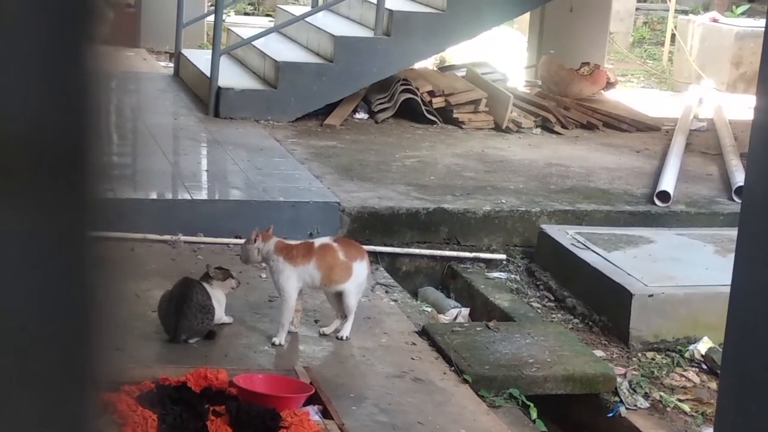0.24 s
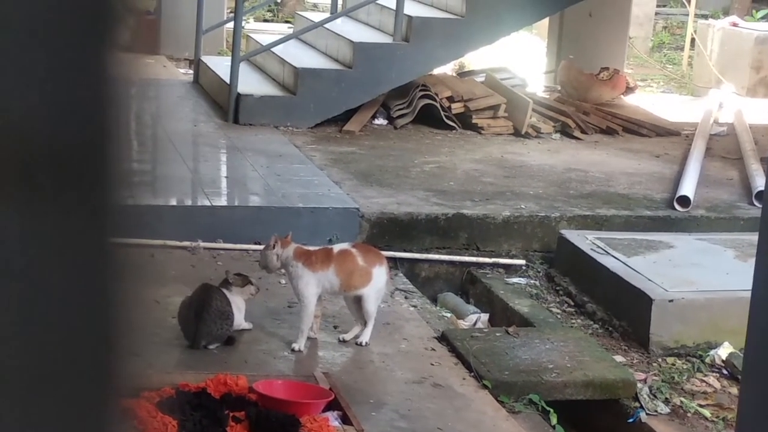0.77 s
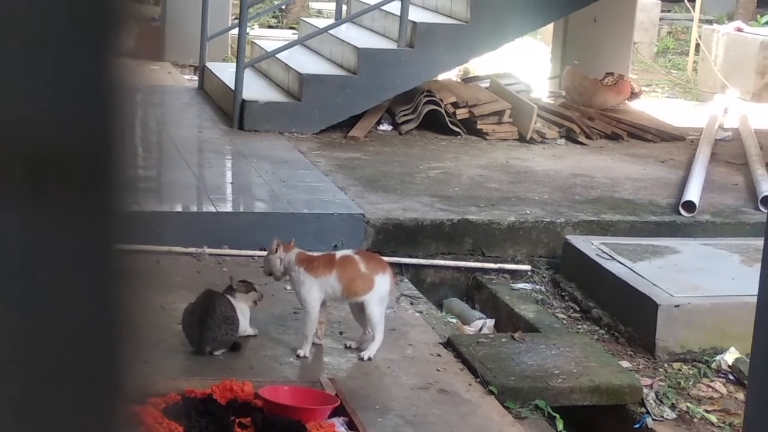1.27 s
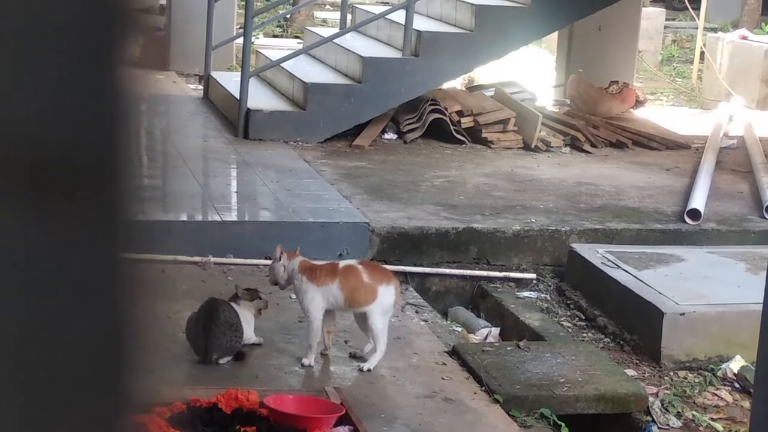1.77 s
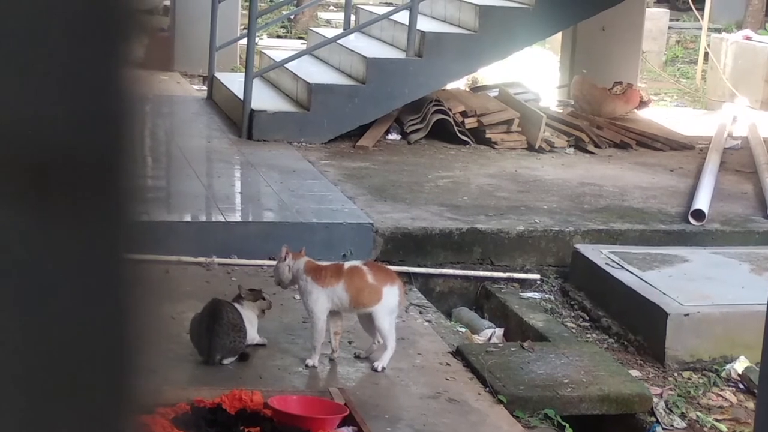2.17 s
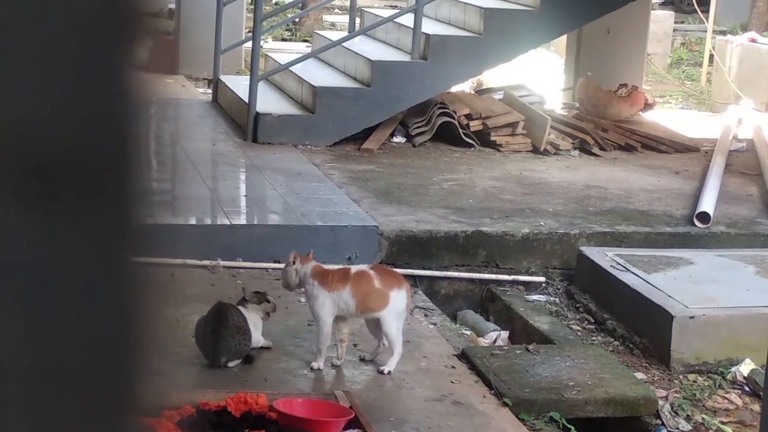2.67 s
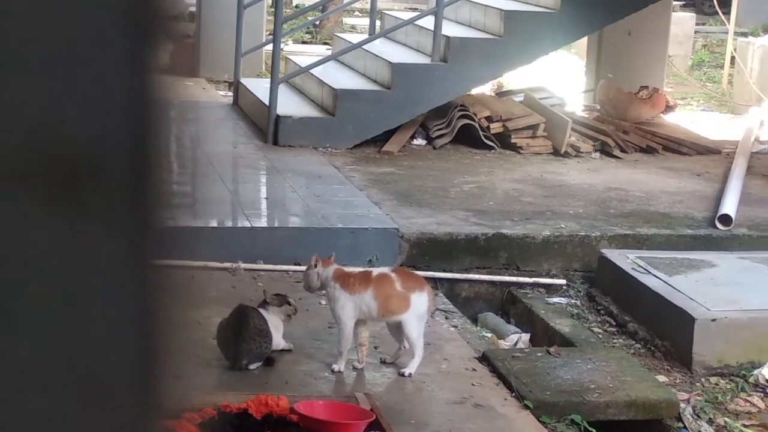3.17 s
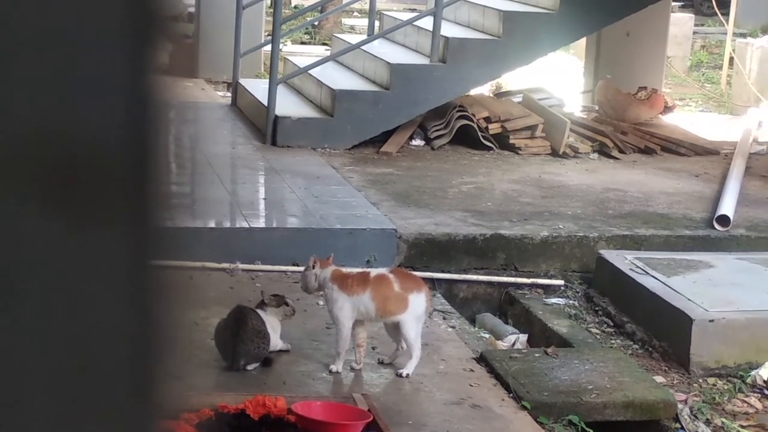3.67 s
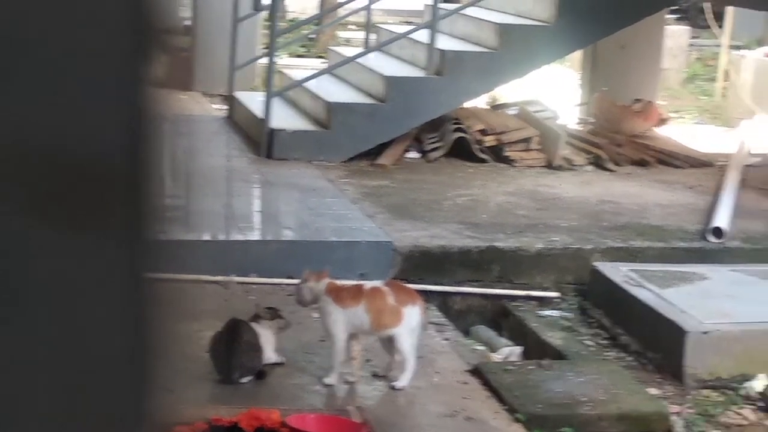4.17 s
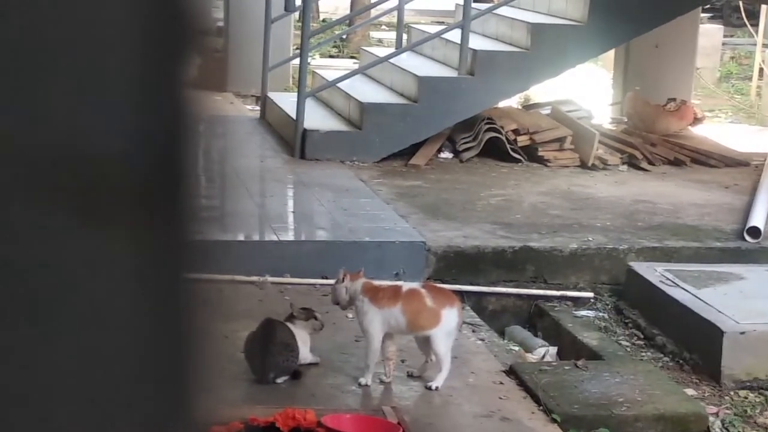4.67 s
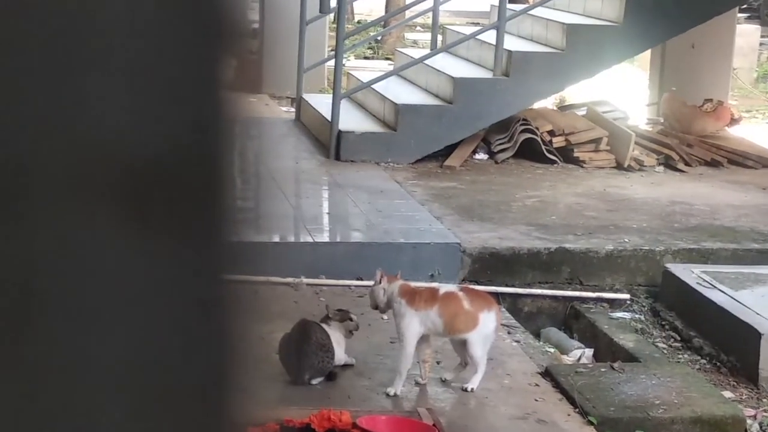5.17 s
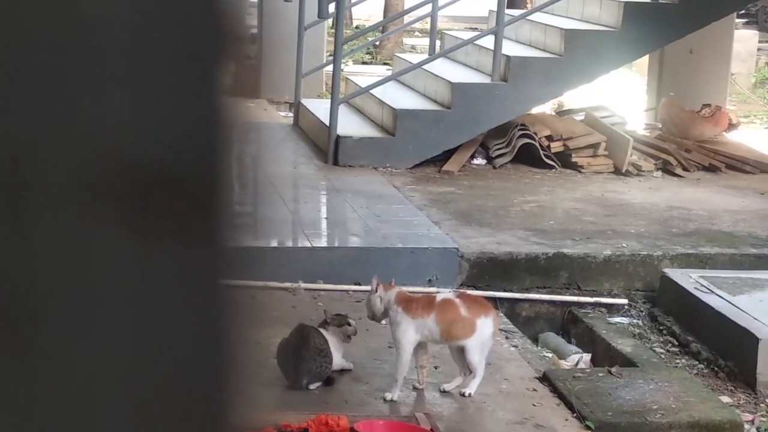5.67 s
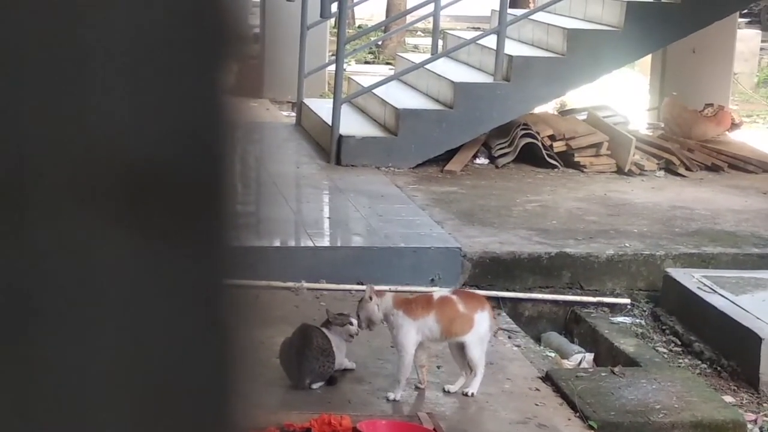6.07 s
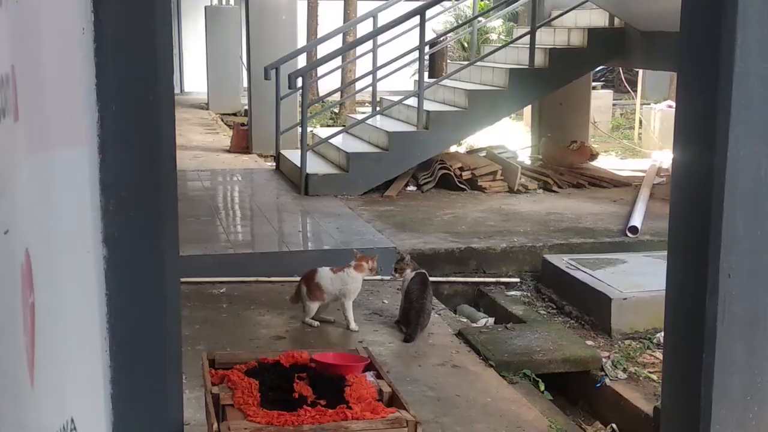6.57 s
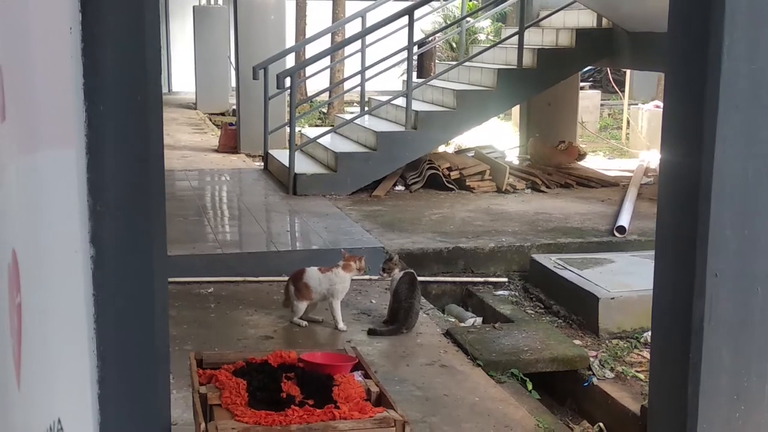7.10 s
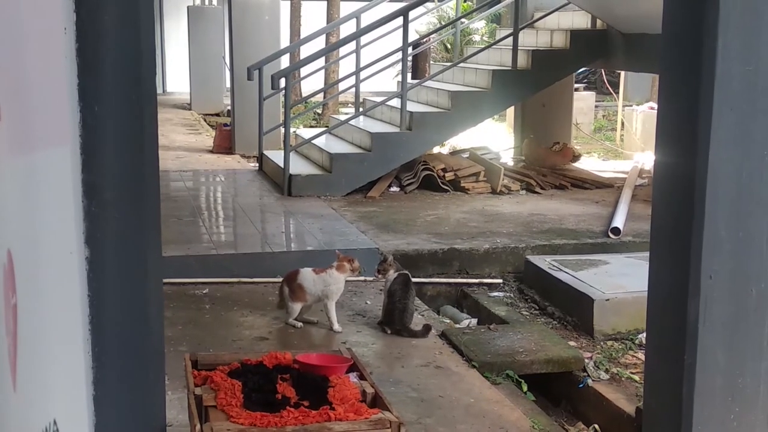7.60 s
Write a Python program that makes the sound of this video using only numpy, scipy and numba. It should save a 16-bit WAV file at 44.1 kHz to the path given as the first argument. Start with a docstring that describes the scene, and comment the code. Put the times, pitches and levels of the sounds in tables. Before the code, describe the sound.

Two cats yowl over each other in an echoing concrete yard, in two bouts, the second cut off abruptly, leaving quiet hum and a tap.

```python
"""Two cats yowling in a yard

Two cats face off on a concrete walkway, a few metres from a hand-held phone, and yowl over each other in two bouts.
Each voice is a train of glottal pulses, now clear, now rasping, through a mouth that opens and closes;
walls and floor echo it. The second bout is cut off short, leaving the quiet yard, made of bands of noise,
and a low rumble that swells and fades in two bands of noise, with a sleeve brush and a finger tap."""
import sys
import numpy as np
from scipy import signal
from scipy.io import wavfile
from scipy.ndimage import uniform_filter1d, minimum_filter1d, map_coordinates
from numba import njit

SR = 44100
rng = np.random.default_rng(int(sys.argv[2]) if len(sys.argv) > 2 else 0)


def put_to_file(sound):
    """Save the sound as 16-bit audio at rate SR, in the file named by the first command-line argument."""
    columns = np.atleast_2d(sound).T  # one column per channel
    safe = np.clip(columns, -1, 1)
    whole_steps = np.round(safe * 32767)
    wavfile.write(sys.argv[1], SR, whole_steps.astype(np.int16))


N = 345744
TIME = np.arange(N) / SR
TOP_HZ = 15400  # upper limit of the phone's microphones


def cats():
    """The leader starts each bout; the rival joins with a rasp and outlasts it in the first."""
    # Pitch, level and mouth of each yowl, each on its own path.
    # Each row: time in seconds, pitch in Hz, relative mouth level in dB, mouth resonance in Hz.
    leader_tail = [(0, 255.6, -34, 1340), (.09, 248.4, -42, 1270), (.17, 235.4, -43.5, 1310),
                   (.28, 207.6, -49, 850)]
    leader_first = [(.3, 217.8, -48.5, 430), (.38, 248.3, -41.5, 599), (.48, 263, -42, 790),
                    (.55, 281.5, -30.5, 830), (.64, 296.4, -32.5, 1075), (.76, 348.5, -24.5, 1220),
                    (.845, 391.6, -19, 1548), (.91, 399.8, -15, 1710), (.97, 399, -20.5, 1890),
                    (1.05, 405, -20, 1870), (1.14, 401.8, -13, 1863), (1.42, 399, -17.5, 1837),
                    (1.52, 392.6, -18.5, 1730), (1.66, 382, -22.5, 1874), (1.76, 363.2, -14, 1508),
                    (2.0, 337.9, -24, 1470), (2.22, 304.3, -29, 1199), (2.52, 252.8, -41, 1217)]
    leader_second = [(4.125, 227.5, -42.5, 880), (4.16, 267.4, -33.5, 1020), (4.2, 294.7, -32.5, 1060),
                     (4.28, 324.6, -22, 1360), (4.39, 352, -20.5, 1460), (4.5, 379.7, -18, 1576),
                     (4.66, 412.3, -15.5, 1705), (4.79, 401.6, -17, 1959), (4.99, 399.7, -12, 1950),
                     (5.09, 391, -18.5, 1796), (5.2, 379.2, -21, 1560), (5.38, 344.2, -22, 1367),
                     (5.5, 342.9, -22.5, 1380), (5.64, 335.1, -21, 1343), (5.78, 343.1, -22, 1540),
                     (5.91, 346.4, -24, 1620), (6.01, 342.5, -19.5, 1500), (6.1, 333.5, -23, 1253),
                     (6.18, 322, -26, 1080), (6.3, 299, -29.5, 1018), (6.55, 266.1, -32, 1063)]
    rival_first = [(1.06, 242.2, -34.5, 1450), (1.12, 313, -29, 1610), (1.28, 480.2, -30.5, 2020),
                   (1.48, 492.4, -23.5, 2017), (1.72, 474.2, -22.5, 1867), (1.92, 455.2, -29, 1832),
                   (2.06, 438.3, -18, 1653), (2.28, 419.6, -25.5, 1560), (2.42, 405.7, -26, 1556),
                   (2.56, 390.6, -29.5, 1507), (2.68, 388, -25.5, 1520), (2.8, 378.6, -28, 1416),
                   (2.88, 386.3, -20.5, 1601), (3.03, 359.5, -19.5, 1420), (3.18, 312.5, -33.5, 1169),
                   (3.25, 289.2, -41, 910), (3.35, 261.2, -45.5, 840), (3.6, 218.7, -49.5, 620),
                   (3.82, 170.9, -52.5, 521.3), (4.04, 160.2, -58, 699)]
    rival_second = [(4.73, 225.4, -41, 1180), (4.79, 278.6, -29.5, 1360), (4.86, 349, -23.5, 1680),
                    (4.96, 435.5, -25, 1920), (5.1, 477, -39.5, 2040), (5.23, 463.7, -26.5, 1900),
                    (5.36, 418.5, -33, 1820), (5.5, 384.5, -33, 1652), (5.63, 389.3, -26, 1691),
                    (5.83, 386.3, -27, 1480), (5.979, 382, -29.5, 1410), (6.25, 383.7, -30.5, 1455),
                    (6.44, 375.1, -27.5, 1528), (6.549, 367.2, -18, 1430)]
    # A quiet moan between the bouts. Each row: time in seconds, pitch in Hz, relative level in dB.
    moan_path = [(3.73, 522, -55), (3.78, 523, -52.5), (3.85, 529.7, -44), (3.87, 575, -70),
                 (3.89, 651, -55), (3.94, 660, -50.5), (3.98, 646, -62), (4.02, 520, -62), (4.1, 502, -48)]
    # Single tones that swell out as whistles or low groans. Each row: loudest time in seconds,
    # seconds from there to 1/e, multiple of the yowl's pitch, relative level in dB.
    leader_swells = [(0.016, 0.043, 5, -34.5), (0.037, 0.067, 9, -47.5), (0.106, 0.054, 10, -49),
                     (.55, 0.026, 3, -39), (3.898, 0.028, 1, -61), (4.138, .02, 8, -45),
                     (4.175, 0.018, 7, -41), (4.35, 0.025, 5, -22), (5.91, 0.13, 5, -25.5),
                     (6.117, 0.087, 13, -49), (6.43, .05, 6, -33)]
    rival_swells = [(2.151, 0.036, 5, -21.5), (2.29, .05, 5, -29), (2.88, 0.042, 7, -44),
                    (3.14, 0.033, 2, -37.5), (3.05, .09, 13, -52), (3.16, 0.039, 13, -49),
                    (3.3, 0.07, 13, -62), (3.27, 0.041, 1, -36), (3.35, 0.038, 2, -50.5),
                    (3.43, 0.024, 1, -38.5), (3.52, 0.074, 2, -50), (3.61, 0.039, 1, -40.5),
                    (3.73, 0.059, 2, -53)]

    leader = leader_yowl(leader_tail, second_db=-14.5, nasal_rise_s=0.078,
                         chest_db=-55, chest_drift_db_per_s=2)
    leader += leader_yowl(leader_first, second_db=-3.0, nasal_rise_s=0.71,
                          chest_db=-39.0, chest_drift_db_per_s=-4.5)
    leader += leader_yowl(leader_second, second_db=-11.5, nasal_rise_s=0.0094,
                          chest_db=-39.0, chest_drift_db_per_s=-2.5)
    leader += fade(moan_path) * overtone(*curves(moan_path))
    leader += swells(leader_second, leader_swells) + hisses()

    rival = rival_yowl(rival_first, second_db=-7.5, nasal_rise_s=1.0,
                       chest_db=-44.0, chest_drift_db_per_s=2.0)
    rival += rival_yowl(rival_second, second_db=-7.5, nasal_rise_s=0.37,
                        chest_db=-42.0, chest_drift_db_per_s=2.0)
    rival += swells(rival_first, rival_swells)

    both = yard(leader, pan_db=-4.0, level_db=-0.5) + yard(rival, pan_db=-7.0, level_db=2.0)
    cut_s = 6.558  # voices and echoes stop together
    return microphone_port(both) * ramp((cut_s - TIME) / .004 + .5)


def leader_yowl(table, second_db, nasal_rise_s, chest_db, chest_drift_db_per_s):
    """The leader's voice: clear and nasal."""
    # At full strain the folds close early and late in turn, adding the octave below.
    # Each row: time in seconds, shift in cycles.
    doubling = [(1.05, 0), (1.1, .03), (1.22, .035), (1.32, .043), (1.42, .043), (1.5, 0)]
    # How hard the folds rasp. Each row: time in seconds, roughness from 0 to 1.
    rasp = [(0, .04), (1.03, .06), (1.1, .14), (1.2, .06), (1.62, .12), (1.8, .4), (2.0, .2), (4.15, .03),
            (4.5, .07), (5.15, .06), (5.28, .3), (5.42, .1), (6.0, .1), (6.25, .18), (6.5, .22)]
    # Weak throat resonances that shift as a yowl opens.
    # Each row: slack centre in Hz, open centre in Hz, base width in Hz, relative gain in dB.
    throat = [(3700, 4400, 530, 6), (4780, 5650, 800, 2), (4670, 5050, 480, 0), (6450, 7750, 460, -2.5),
              (9000, 10600, 1000, -6.5), (13000, 12000, 2000, -12)]
    return yowl(table, nasal_rise_s, chest_db, chest_drift_db_per_s,
                curves(doubling)[0], curves(rasp)[0], throat, open_hz=350, upper_db=-27.0,
                mouth_width_hz=174, second_ratio=1.475, second_width_hz=253, second_db=second_db,
                creak=0.049, chest_knee_hz=272, chest_fall_db_per_hz=3.5, octave_db=-21.5)


def rival_yowl(table, second_db, nasal_rise_s, chest_db, chest_drift_db_per_s):
    """The rival's voice: hoarser and a little duller."""
    # How hard the folds rasp. Each row: time in seconds, roughness from 0 to 1.
    rasp = [(1.07, .5), (1.3, .6), (1.6, .65), (1.85, .8), (1.98, .45), (2.06, .12), (2.4, .13),
            (2.55, .28), (2.8, .3), (2.88, .1), (3.05, .17), (3.2, .22), (3.9, .25), (4.75, .42),
            (4.9, .38), (5.2, .65), (5.42, .5), (5.58, .18), (6.2, .2), (6.5, .27)]
    # Weak throat resonances that sweep up as a yowl opens.
    # Each row: slack centre in Hz, open centre in Hz, base width in Hz, relative gain in dB.
    throat = [(2900, 4400, 290, 0.5), (3220, 5260, 450, 6), (3900, 6300, 580, -0.5), (5600, 6800, 800, -12),
              (8680, 10900, 570, -10), (12820, 14000, 1740, -12.5)]
    return yowl(table, nasal_rise_s, chest_db, chest_drift_db_per_s,
                np.zeros(N), curves(rasp)[0], throat, open_hz=416.4, upper_db=-29.0,
                mouth_width_hz=228, second_ratio=1.37, second_width_hz=527, second_db=second_db,
                creak=0.06, chest_knee_hz=338.6, chest_fall_db_per_hz=0.2, octave_db=-20)


def yowl(table, nasal_rise_s, chest_db, chest_drift_db_per_s, doubling, rasp, throat, open_hz, upper_db,
         mouth_width_hz, second_ratio, second_width_hz, second_db, creak,
         chest_knee_hz, chest_fall_db_per_hz, octave_db):
    """Pulses and the air they release ring the mouth, throat and chest."""
    gate, out = fade(table), np.zeros(N)
    live = gate > 0
    hz, db, mouth_hz = (c[live] for c in glide(table))
    age_s = TIME[live] - table[0][0]
    strain = ramp((hz - 449) / 35.3)
    slack = ramp((435 - hz) / 109.4)
    # the jaw trembles, so that neighbouring harmonics trade strength
    mouth_hz = mouth_hz * (1 + .018 * walk(13)[live])
    turns, folds, puffs = glottis(hz, rasp[live] + creak * slack, doubling[live], live)

    # the second resonance comes in with the age of the yowl
    nasal = undb(second_db) * ramp(age_s / nasal_rise_s) ** 2
    mouth = mouth_sound(folds, mouth_hz, mouth_width_hz, nasal, second_ratio, second_width_hz)

    opening = ramp((hz - 247) / (open_hz - 247))  # the throat stays slack below 247 Hz
    upper = throat_sound(undb(-5) * folds + undb(-12) * puffs, throat, opening)
    # a wide mouth favours its main resonance over the upper ones
    balance_db = upper_db - 5.2 * np.log2(np.maximum(mouth_hz, 900) / 1500)
    upper = undb(balance_db + 1.0 * walk(5.8)[live]) * upper

    # the chest hum dies away at the bottom of the range
    body_db = chest_db + chest_drift_db_per_s * age_s
    body_db = body_db - chest_fall_db_per_hz * np.maximum(chest_knee_hz - hz, 0)
    # strained or rasping folds give a weaker fundamental
    body_db = body_db - 3.5 * strain - 3 * rasp[live] + 2.2 * walk(14)[live]
    chest = undb(body_db) * chest_hum(turns, octave_db)

    growl = undb(-33) * unit(resonate(resonate(puffs, 480, 380), 480, 380))
    flutter_db = (1.2 + 1.7 * slack) * walk(22)[live]
    out[live] = (undb(db) * (mouth + upper + growl) + chest) * undb(flutter_db)
    return gate * out


def glottis(hz, rough, doubling, live):
    """The folds' turns, pulses and puffs of air; roughness shakes timing and strength."""
    # How a full rasp makes the folds lurch. In order: share of pitch, share of strength,
    # shift of alternate pulses in cycles.
    lurch = (.004, .45, .035)
    pitch_lurch, strength_lurch, split = lurch
    turns = np.cumsum(hz * (1 + (.001 + pitch_lurch * rough) * walk(55)[live])) / SR
    jitter = .05 * rough * walk(260)[live]
    alternation = doubling + split * rough * walk(14)[live]
    cycles = turns + jitter + alternation * np.cos(np.pi * turns)  # the cosine flips every cycle
    noise = rng.standard_normal(N)[live]
    puffs = unit(noise * (1 + 0.82 * np.cos(2 * np.pi * cycles)))
    folds = pulses(cycles) * (1 + strength_lurch * rough * walk(110)[live])
    folds = folds + .33 * rough ** 2 * puffs  # turbulence of the rasp
    return turns, folds, puffs


def pulses(cycles, count=31):
    """One band-limited pulse per cycle: equal harmonics 1..count, rms 1."""
    half = np.pi * (cycles % 1) + 1e-9
    return (np.sin((2 * count + 1) * half) / np.sin(half) - 1) / np.sqrt(2 * count)


def mouth_sound(folds, mouth_hz, mouth_width_hz, nasal, second_ratio, second_width_hz):
    """The two lower resonances of the mouth, muffled when its lips are nearly shut."""
    # the second rests at 2060 Hz until the opening mouth pushes it up, at most to 2634 Hz
    second_hz = np.clip(second_ratio * mouth_hz, 2060, 2634)
    main = svf(folds, mouth_hz, float(mouth_width_hz))
    mouth = main - nasal * svf(folds, second_hz, float(second_width_hz))
    shut = np.clip((1000 - mouth_hz) / 350, 0, .9)
    mouth = (1 - shut) * mouth + shut * cut(mouth, 990, "low")
    return steady(cut(cut(mouth, 2947, "low", order=8), 300, "high"))


def throat_sound(airy, throat, opening):
    """Upper resonances that shift with the pitch until the throat is fully open."""
    upper = 0
    spread = 1 - .35 * (1 - opening)  # a slack throat rings more narrowly
    for low_hz, high_hz, width_hz, gain_db in throat:
        centre = low_hz + opening * (high_hz - low_hz)
        width = 2 * width_hz * spread  # of each of two passes
        upper = upper + undb(gain_db) * svf(svf(airy, centre, width), centre, width)
    return steady(cut(upper, 3300, "high", order=4))


def chest_hum(turns, octave_db):
    """The fundamental and its octave leave through the chest whatever the mouth does."""
    hum = np.sin(2 * np.pi * turns) - undb(octave_db) * np.sin(2 * np.pi * 2 * turns)
    return np.sqrt(2) * hum


def swells(table, events):
    """Multiples of a yowl's pitch, or of its end pitches outside it, swell and die away."""
    hz, out = glide(table)[0], np.zeros(N)
    for s, fall_s, harmonic, db in events:
        out += np.exp(-((TIME - s) / fall_s) ** 2) * overtone(round(harmonic) * hz, db)
    return out


def overtone(hz, db):
    """One slightly unsteady partial."""
    turns = np.cumsum(hz * (1 + .003 * walk(60))) / SR
    return np.sqrt(2) * undb(db + 2.5 * walk(25)) * np.sin(2 * np.pi * turns)


def hisses():
    """Airy hisses of air rushing past the teeth, most brief and gliding, one long and nearly steady."""
    # Each row: loudest time in seconds, seconds from there to 1/e, centre in Hz, glide in Hz per second,
    # relative level in dB.
    gaps = [(0.798, 0.066, 7260, 4995, -51.5), (1.26, 0.47, 5770, -4, -44),
            (2.833, 0.051, 10060, -5000, -58), (4.303, 0.11, 4360, 1192.5, -48.5),
            (4.39, 0.11, 7300, 3506, -49.5), (5.316, 0.15, 7840, -2000, -57)]
    width_hz = 360.  # of each of two passes
    out = np.zeros(N)
    for s, fall_s, hz, glide_hz_per_s, db in gaps:
        near = np.abs(TIME - s) < 3 * fall_s
        t = TIME[near] - s
        centre = np.clip(hz + glide_hz_per_s * t, 1000, TOP_HZ)
        noise = svf(rng.standard_normal(N)[near], centre, width_hz)
        noise = unit(svf(noise, centre, width_hz))
        out[near] += undb(db) * np.exp(-(t / fall_s) ** 2) * noise
    return out


def yard(voice, pan_db, level_db):
    """Direct sound, hard echoes and a short diffuse tail; the echo paths drift as heads and phone move."""
    # Echoes off floor, walls and stairs. Each row: delay to left in ms, delay to right in ms,
    # level against the direct sound in dB.
    reflections = [(1.074, 5.8, -31), (4.42, 2, -18), (6.24, 9, -22), (13.357, 11.2, -13),
                   (21.174, 27, -4.5)]
    t60_s, tail_db = .33, -7
    t = np.arange(SR // 2) / SR
    tail = rng.standard_normal((2, len(t))) * undb(-60 * t / t60_s)
    tail = cut(tail, 346, "high", order=3)
    response = undb(tail_db) * tail / np.sqrt(np.sum(tail ** 2) / 2)
    # the treble is beamed away from the phone and arrives mostly scattered by things close by
    scatter = cut(rng.standard_normal((2, len(t))) * np.exp(-t / 0.0082), 3300, "high", order=3)
    response += undb(5.5) * scatter / np.sqrt(np.sum(scatter ** 2) / 2)
    for left_ms, right_ms, db in reflections:
        response[0, int(left_ms * SR / 1000)] += undb(db)
        response[1, int(right_ms * SR / 1000)] += undb(db)
    echoes = signal.fftconvolve(voice[None], response, axes=1)[:, :N]
    drifting = [map_coordinates(e, [(TIME + .00007 * walk(5)) * SR], order=3) for e in echoes]
    heard = voice + np.array(drifting)
    # the phone shades one port, except from the lowest tones
    bass = cut(heard, 393, "low", order=1)
    balance = undb(np.array([[pan_db], [-pan_db]]) / 2)
    return undb(level_db) * (bass + balance * (heard - bass))


def microphone_port(stereo):
    """The left microphone port resonates: it turns the phase and lifts a band just below."""
    # In order: centre in Hz, width in Hz, share added.
    port_lift = (2260, 770, 0.26)
    left, right = stereo
    left = left - 2 * resonate(left, 2740, 955)
    port_hz, port_width_hz, share = port_lift
    left = left + share * resonate(left, port_hz, port_width_hz)
    return np.array([left, right])


def low_rumble():
    """A low rumble swells and fades in two bands of noise."""
    # Each row: start in seconds, length in seconds, level in dB before it wavers.
    deep_rumbles = [(0.063, 0.053, -54), (0.194, 0.089, -55), (0.405, 0.13, -51), (0.745, 0.045, -54),
                    (2.587, 0.041, -60), (2.92, 0.044, -56), (2.984, 0.072, -55), (3.149, 0.078, -55),
                    (3.288, 0.053, -54), (3.434, 0.07, -54), (3.733, 0.11, -58), (4.186, 0.042, -57),
                    (4.3, 0.16, -55), (4.563, 0.04, -46), (4.634, 0.05, -51), (4.735, 0.036, -54),
                    (4.942, 0.049, -49), (5.239, 0.097, -52), (6.262, 0.055, -59), (6.428, 0.13, -51),
                    (6.88, .025, -64), (7.185, 0.049, -53), (7.26, .04, -46), (7.612, 0.017, -50.5),
                    (7.75, .02, -70)]
    upper_rumbles = [(0.179, 0.1, -47.5), (0.899, 0.043, -55), (1.18, 0.047, -49.5), (1.54, 0.15, -55),
                     (2.44, 0.05, -54.5), (2.634, 0.039, -50.5), (2.876, 0.2, -52), (3.172, 0.043, -53),
                     (3.24, 0.11, -45.5), (3.438, 0.06, -51.5), (3.528, 0.35, -49.5), (4.192, 0.058, -50),
                     (4.62, 0.037, -62), (4.834, 0.042, -45), (5.264, 0.026, -55), (6.69, 0.044, -52.5),
                     (7.23, 0.021, -57.5), (7.465, 0.068, -50.5), (7.81, 0.026, -56.5)]
    deep = rumble_band(42, 119.5, rumble_level(deep_rumbles, rest_db=-79))
    upper = rumble_band(126, 256, rumble_level(upper_rumbles, rest_db=-72))
    return deep + upper


def rumble_level(table, rest_db):
    """Level in dB of a wavering faint floor on which each rumble swells, holds and fades."""
    attack_s, release_s = 0.011, 0.014
    gain = undb(rest_db + 6 * walk(12))
    for s, length, db in table:
        swell = ramp(1 + (TIME - s) / attack_s)
        release = ramp(1 + (s + length - TIME) / release_s)
        gain = gain + undb(db) * swell * release
    return 20 * np.log10(gain)


def rumble_band(low_hz, high_hz, db):
    """Uneven low noise, nearly alike in both channels."""
    noise = rng.standard_normal((2, N))
    mid, side = cut(cut(noise, high_hz, "low", order=6), low_hz, "high", order=4)
    return (steady(mid) + 0.34 * steady(side) * np.array([[1], [-1]])) * undb(db + 2 * walk(25))


def sleeve():
    """Cloth brushes past: a broad band of noise swells and fades."""
    # Each row: time in seconds, level in dB.
    brush = [(6.66, -85), (6.76, -56.5), (6.82, -56.5), (6.95, -73)]
    noise = resonate(resonate(rng.standard_normal((2, N)), 4110, 2042), 4110, 2006)
    return unit(noise) * undb(curves(brush)[0])


def tap():
    """A finger taps the case: a sharp click with a little noise, and a dying low tone."""
    # In order: time in seconds, click level in dB, thud pitch in Hz, thud level in dB.
    finger_tap = (6.8187, -25, 175, -42)
    s, click_db, thud_hz, thud_db = finger_tap
    t = np.maximum(TIME - s, 0)
    rattle = rng.standard_normal((2, N)) * .05 * np.exp(-t / .007)
    click = undb(click_db) * (np.exp(-t / .00006) + rattle)
    thud = undb(thud_db) * np.sin(2 * np.pi * thud_hz * t) * np.exp(-t / 0.018)
    return (TIME >= s) * (click + thud)


def air():
    """Distant outdoor hum in half-octave bands that waver a little; the bass is more alike left and right."""
    # Each row: frequency in Hz, relative noise density in dB per Hz.
    spectrum = [(220, -22), (380, -4), (440, -0.5), (620, -5), (1000, -7), (1660, -18.5), (2560, -13.5),
                (4960, -33.5), (8230, -18), (15000, -40)]
    f, db = np.transpose(spectrum)
    out = 0
    for hz in 440 * 2 ** (np.arange(11) / 2):
        noise = rng.standard_normal((2, N))
        mid, side = resonate(resonate(noise, hz, hz / 2), hz, hz / 2)
        gain = undb(np.interp(np.log(hz), np.log(f), db) + 1.0 * walk(22.0))
        out = out + gain * (mid + min(hz / 1400, 1) * side * np.array([[1], [-1]]))
    return undb(-56) * unit(cut(out, 240, "high", order=4))


def undb(db):
    """Decibels to gain."""
    return 10 ** (np.asarray(db) / 20)


def curves(table):
    """Each column of a table, joined by straight lines in time."""
    s, *columns = np.transpose(table)
    return [np.interp(TIME, s, c) for c in columns]


def glide(table, size=1765):
    """A yowl's controls with their corners rounded: muscles cannot jump."""
    return [uniform_filter1d(c, size) for c in curves(table)]


def fade(table):
    """1 while a table lasts, with short soft ends."""
    start, end = table[0][0], table[-1][0]
    return np.interp(TIME, [start - .02, start, end, end + 0.1], [0, 1, 1, 0])


def ramp(x):
    """Limit to 0..1."""
    return np.clip(x, 0, 1)


def unit(x):
    """Scale to rms 1."""
    return x / np.sqrt(np.mean(x ** 2))


def steady(x, size=2205):
    """Hold the short-term rms near 1."""
    return x / np.sqrt(np.abs(uniform_filter1d(x * x, size)) + 1e-14)


def walk(rate):
    """Smooth random wander of spread near 1, with about rate new values a second."""
    k = max(int(SR / rate), 2)
    steps = np.repeat(rng.standard_normal(N // k + 1), k)
    return 1.338 * uniform_filter1d(steps, k)[:N]


def cut(x, hz, kind, order=2):
    """Butterworth low-pass or high-pass."""
    return signal.sosfilt(signal.butter(order, min(hz, SR / 2 - 1), kind, fs=SR, output="sos"), x)


def resonate(x, hz, width_hz):
    """A fixed resonance."""
    return signal.lfilter(*signal.iirpeak(hz, hz / width_hz, fs=SR), x)


def svf(x, hz, width):
    """A resonance whose centre and width may move, gain 1 at the centre."""
    return band_pass(x, hz, width / hz)


@njit
def band_pass(x, hz, damping):
    """State-variable band-pass filter: two integrators in a loop."""
    y, band, low = np.empty(len(x)), 0., 0.
    for i in range(len(x)):
        g, k = np.tan(np.pi * hz[i] / SR), damping[i]
        v = (band + g * (x[i] + 1e-18 - low)) / (1 + g * (g + k))
        band = 2 * v - band
        low += 2 * g * v
        y[i] = k * v
    return y


def scene():
    """Cats, low rumble, sleeve, tap and yard together."""
    return cats() + low_rumble() + sleeve() + tap() + air()


def record(dry):
    """The phone holds the loudest peaks down and cuts the top."""
    allowed = np.minimum(1, .53 / (np.abs(dry).max(axis=0) + 1e-9))
    gain = uniform_filter1d(minimum_filter1d(allowed, size=441), size=441)
    top_cut = signal.ellip(10, .2, 80, TOP_HZ, fs=SR, output="sos")
    return signal.sosfilt(top_cut, dry * gain)


dry = scene()
out = record(dry)
put_to_file(out)
```